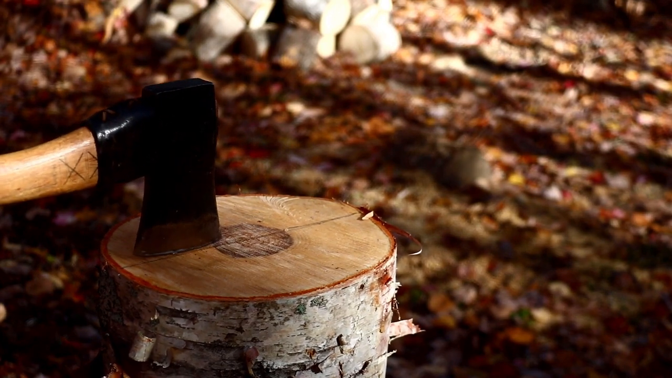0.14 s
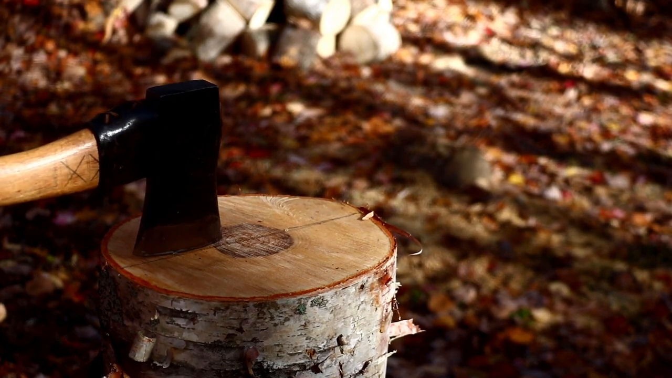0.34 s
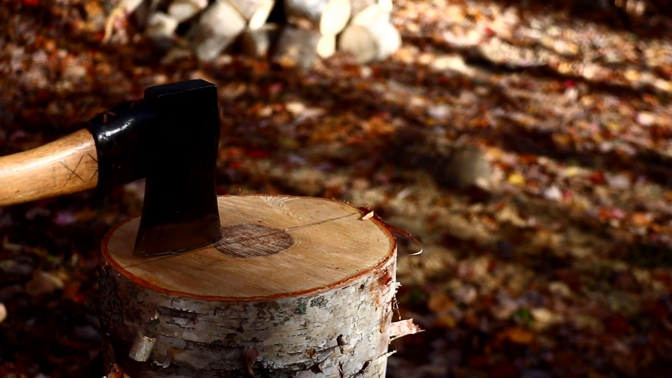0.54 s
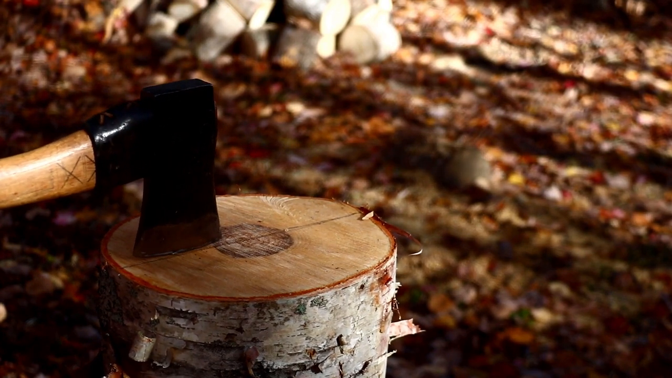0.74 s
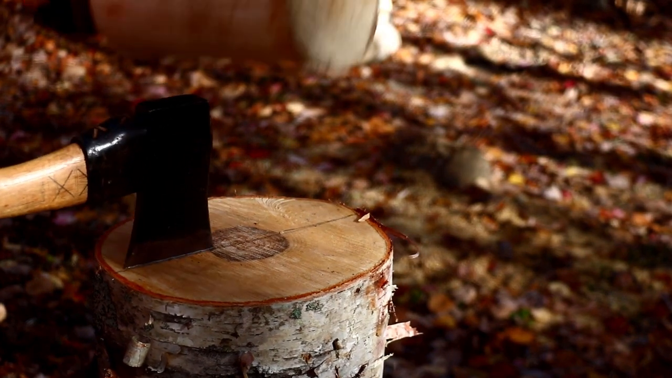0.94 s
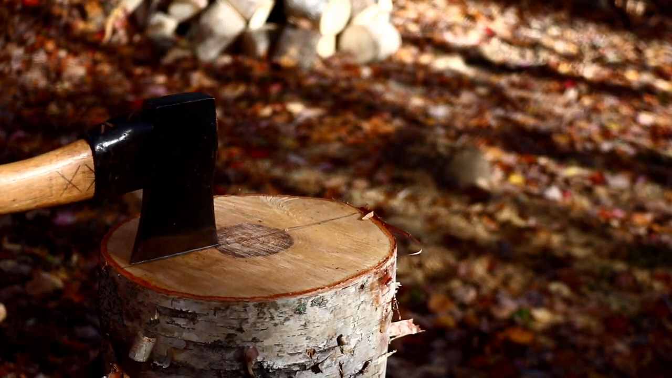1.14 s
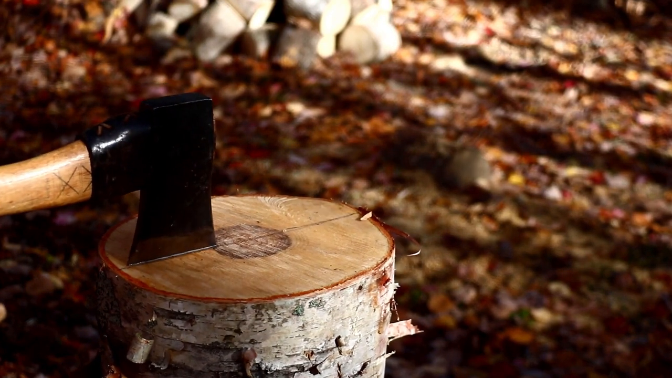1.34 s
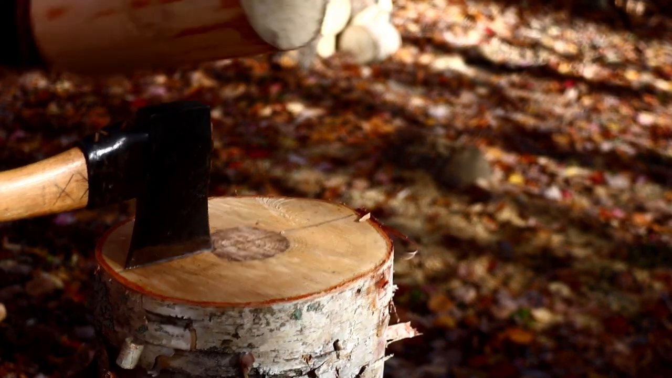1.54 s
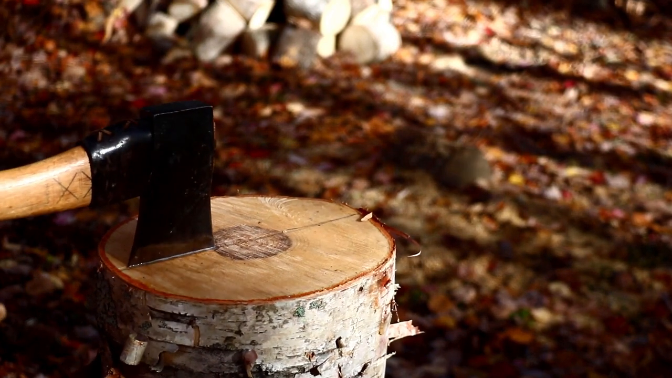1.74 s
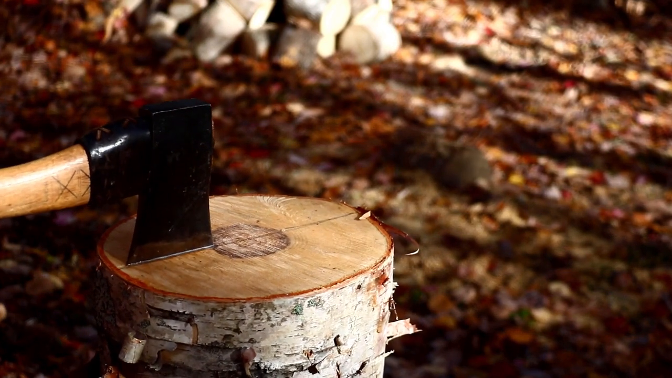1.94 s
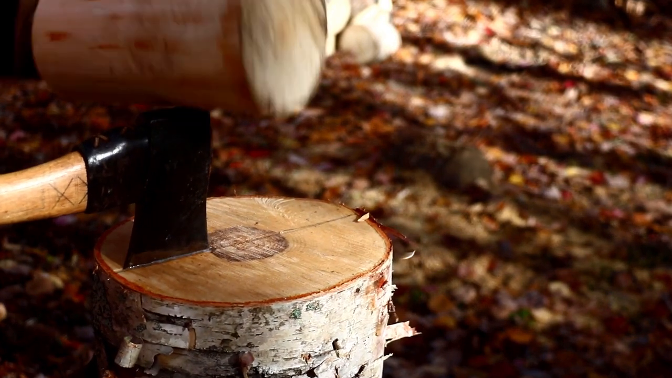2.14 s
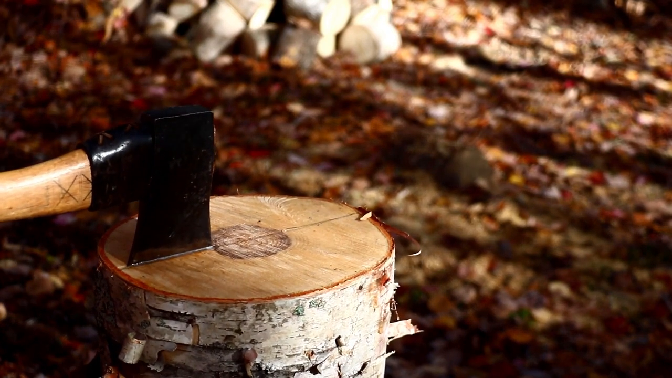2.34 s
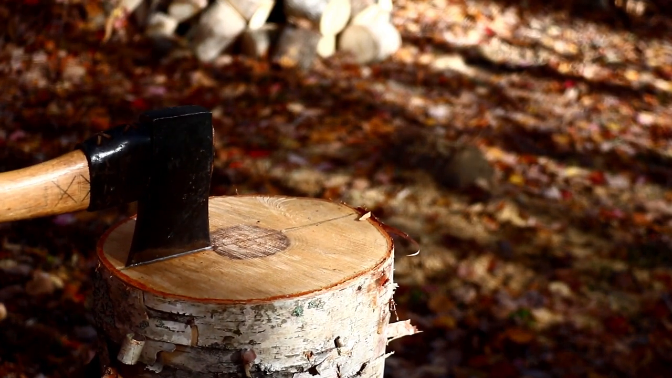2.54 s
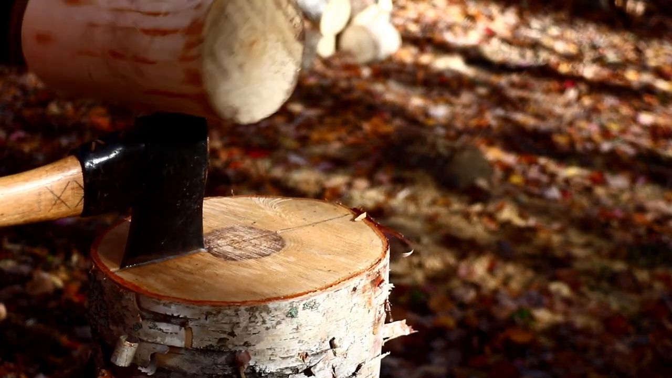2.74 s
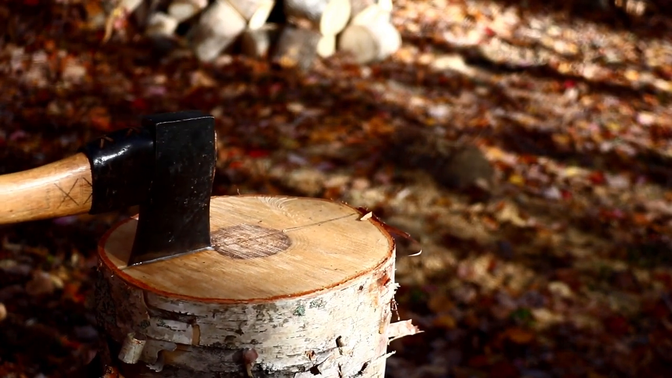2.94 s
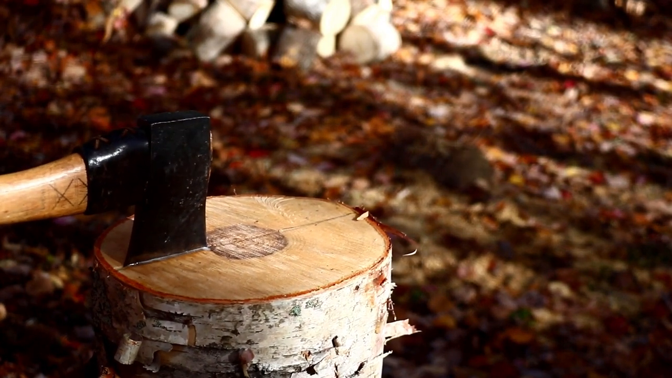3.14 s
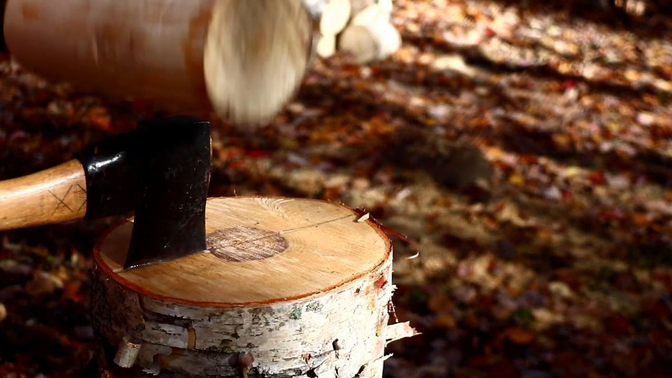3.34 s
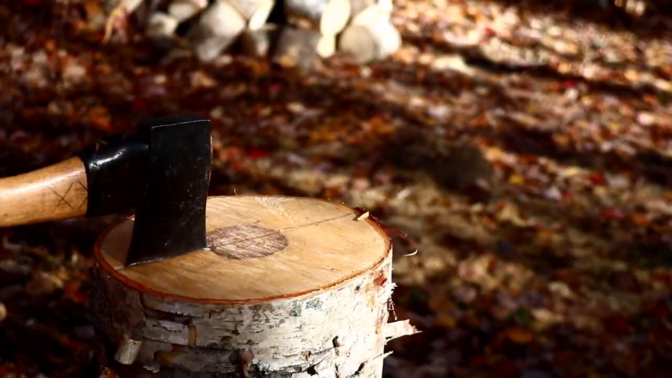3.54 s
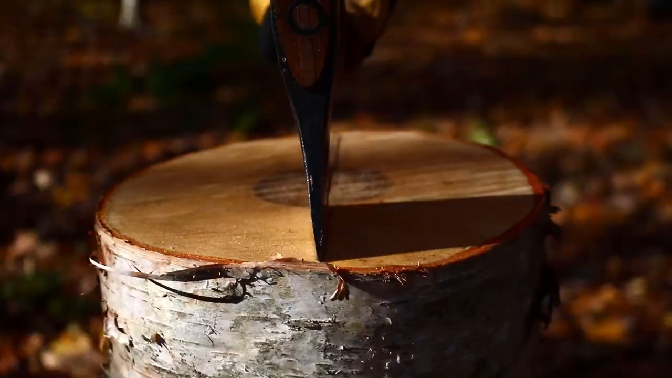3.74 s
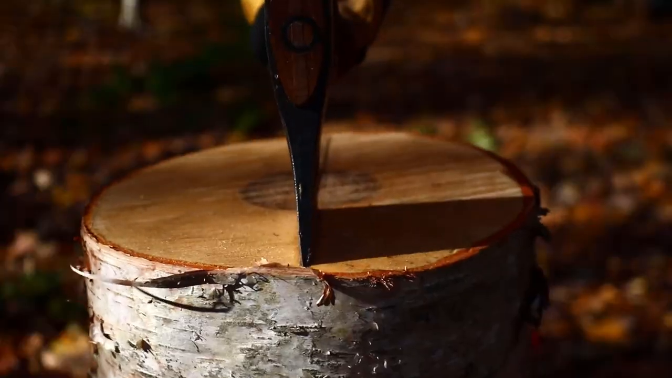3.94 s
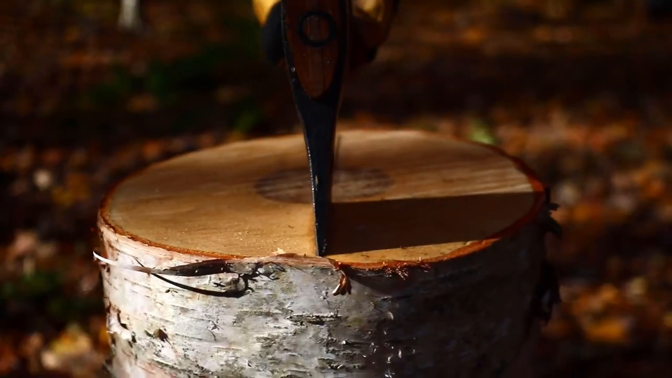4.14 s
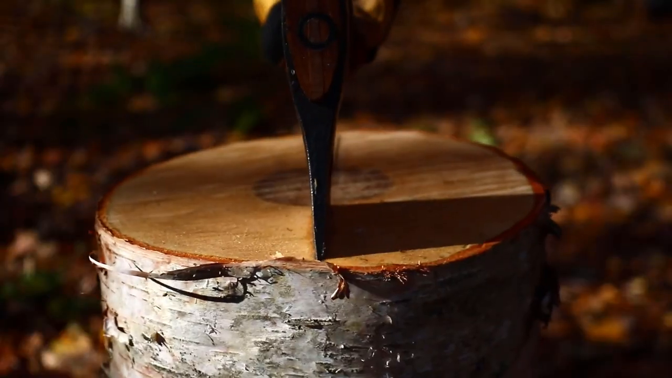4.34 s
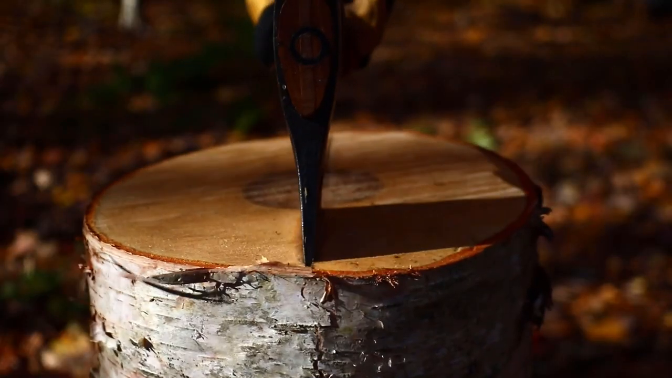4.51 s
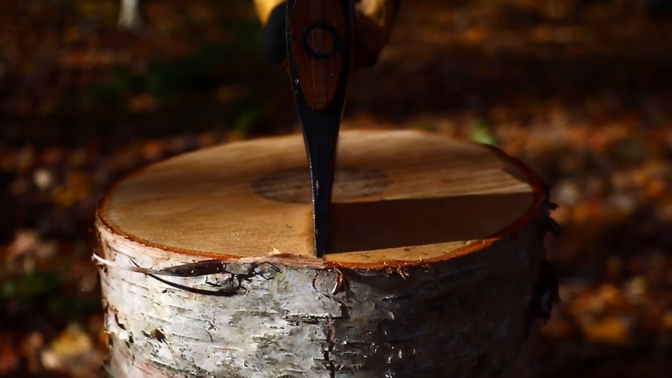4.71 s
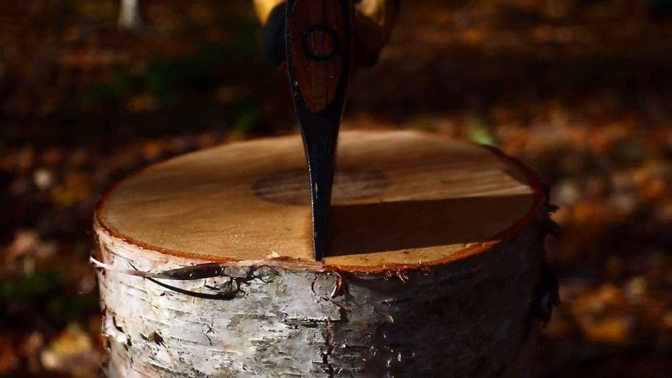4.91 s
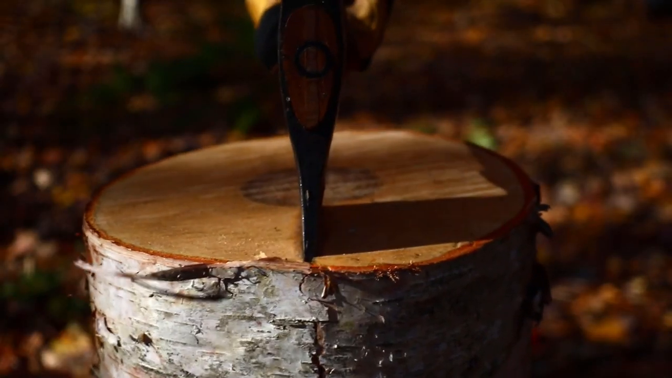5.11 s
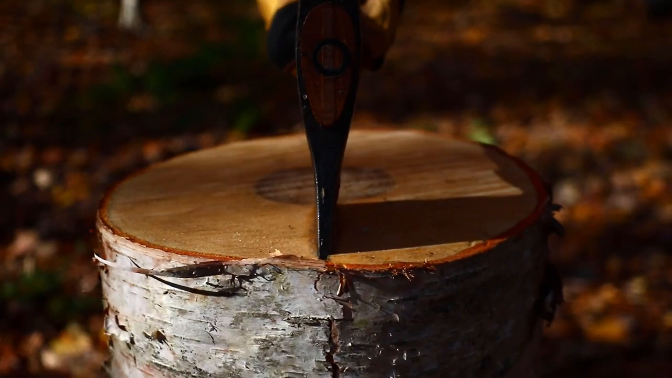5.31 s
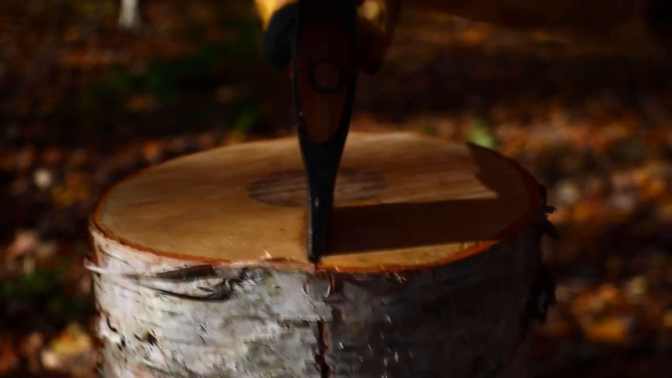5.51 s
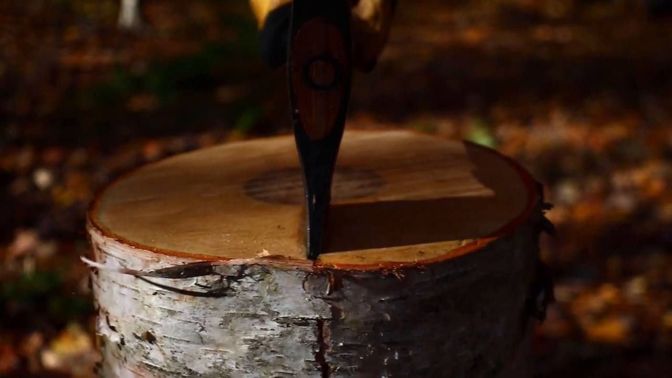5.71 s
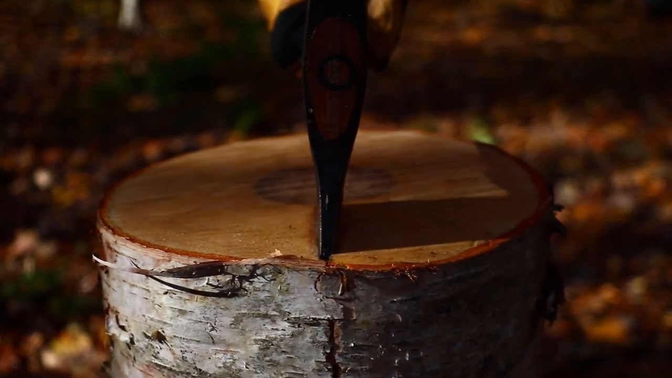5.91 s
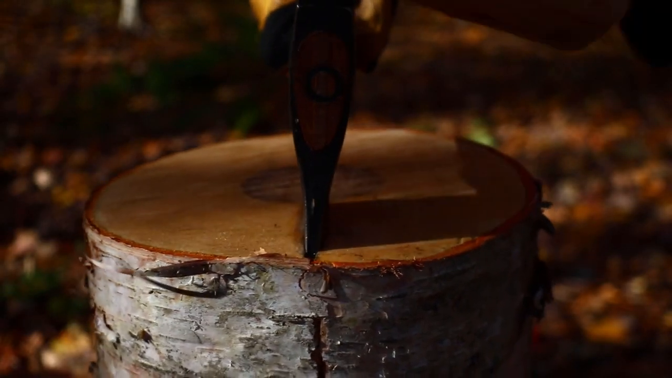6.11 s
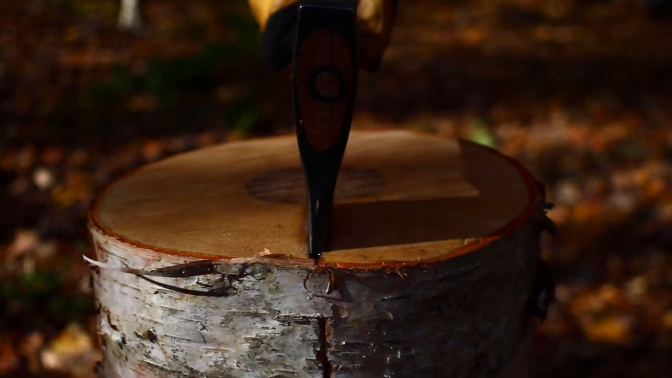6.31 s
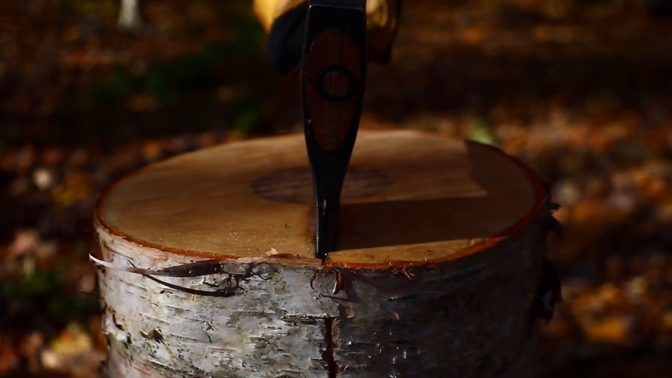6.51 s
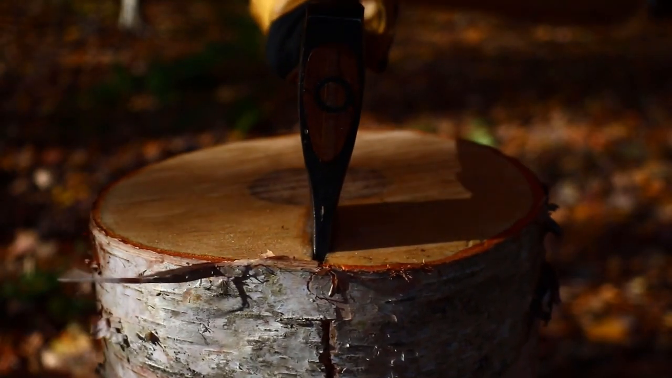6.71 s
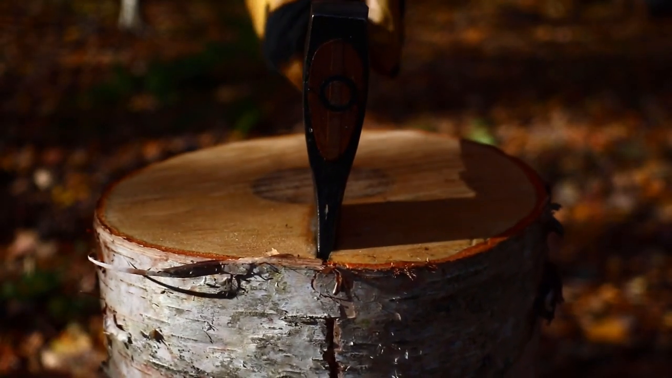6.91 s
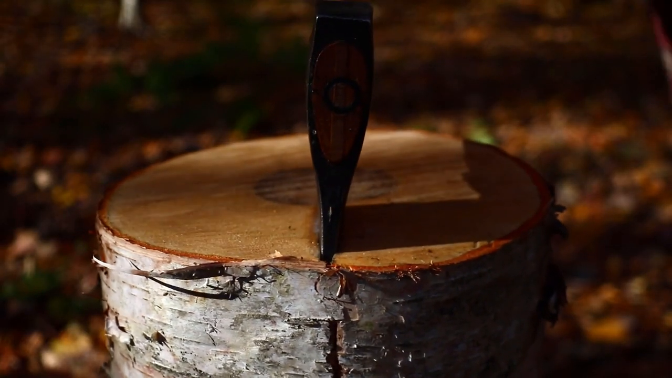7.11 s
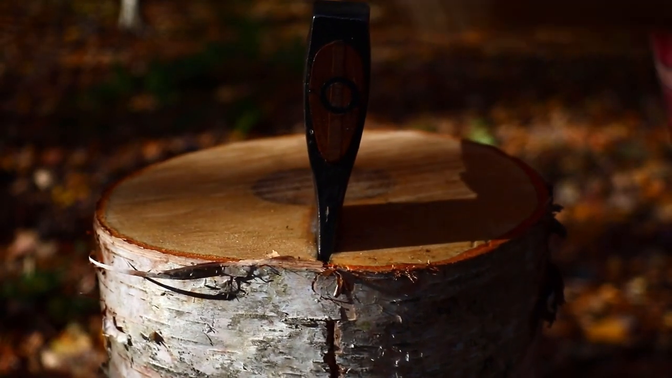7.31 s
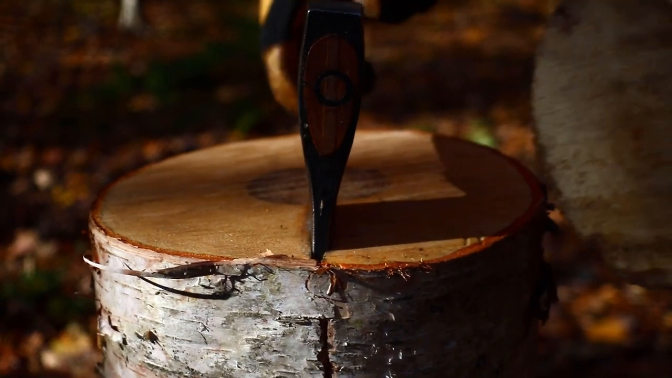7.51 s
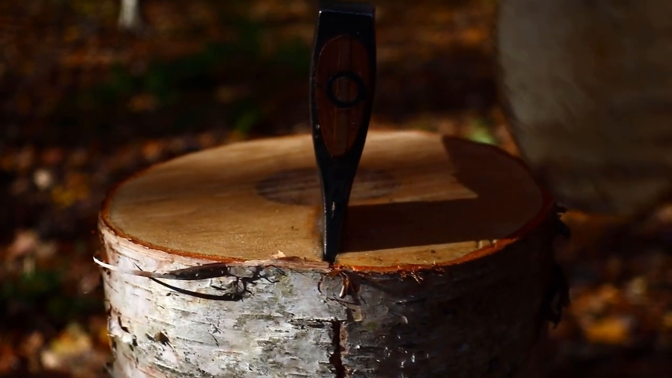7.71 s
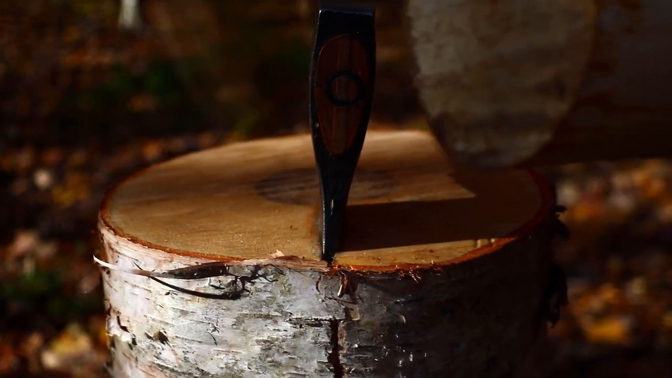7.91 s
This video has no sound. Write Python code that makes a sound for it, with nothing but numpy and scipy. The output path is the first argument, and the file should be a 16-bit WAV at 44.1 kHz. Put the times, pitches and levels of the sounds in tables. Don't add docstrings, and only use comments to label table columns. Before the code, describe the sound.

A quiet outdoor place among trees: leaves rustle, and a low distant engine idles, changes gear at about 0.3 s, then climbs in pitch and fades after 2 s. Faint twig ticks come at 0.4 s. Loud wooden mallet blows on a hatchet fall at 0.9, 1.57, 2.16, 2.75 and 3.3 s, each a short hollow whack with crunch and a little steel ring, clipped by the close microphone, with low tripod shake, a rough fading hum and tree echoes. At 3.7 s the perspective changes and the leaf hiss grows brighter. Six more blows land at 3.9, 4.5, 5.0, 5.6, 6.1 and 6.7 s. From 4.5 s the round rocks and drops with small hollow thumps just after blows; splinters snap around 6.5 s. After a pause, a much softer, dull wooden clunk with dry crackling splinters comes at 7.47 s, leaving rustling leaves.

```python
import sys
import numpy as np
from scipy import signal
from scipy.fft import rfft, irfft
from scipy.io import wavfile
from scipy.ndimage import uniform_filter1d

SR = 44100
rng = np.random.default_rng(int(sys.argv[2]) if len(sys.argv) > 2 else 0)


def decibels_to_gain(level_db):
    exponent = np.asarray(level_db, float) / 20
    return 10 ** exponent


def pcm_store(signal):
    levels = np.round(np.clip(np.atleast_2d(signal), -1, 1) * 32767)
    wavfile.write(sys.argv[1], SR, levels.astype(np.int16).T)


N = 350595

# start_s, level_db, aim, thud_db, crunch_db
BLOW_EVENTS = [(0.898, 10.5, 0.13, 9, -2.5), (1.5659, 10.5, 0.92, -1, -5), (2.162, 14.5, -0.13, -1.5, 9),
               (2.7460, 15, -0.19, -1.5, 2), (3.3110, 12.5, -0.43, 3, -2.5), (3.8822, 14.5, -0.48, -3, -4),
               (4.4569, 13.5, 0.56, 6, 2), (5, 12.5, 0.23, 6, 8.5), (5.564, 13.5, -0.72, -8, -3),
               (6.1390, 12.5, -0.31, 0.5, 0.6), (6.6754, 12.5, -0.012, 5, 4), (7.467, -5.5, -0.56, 0, 7)]
# start_s, level_db, contact_ms, crack_db
LANDINGS = [
    (4.5, -12.5, 1.6, 0),
    (5.049, -7.5, 0.86, 1),
    (5.609, -10.5, 3, -8),
    (6.168, -21, 0.8, -8),
    (6.2116, -10.5, 1.67, -12),
    (6.2177, -16.5, 1.14, -22),
    (6.7087, -7.5, 0.61, -1),
    (6.716, -10.5, 1.15, -22),
    (6.743, -13, 0.59, -14),
]
# start_s, level_db, centre_hz, width_octaves
SPLINTER_TICKS = [(.3828, -36.5, 1500, 1.2), (0.383, -38.5, 4500, 1.05), (.868, -51, 4530, 2.2),
                  (3.211, -41, 1950, 0.91), (4.524, -30.5, 2200, 2), (5.067, -31, 1900, 1.1),
                  (6.440, -36, 1400, 2.1), (6.460, -40, 3500, 2), (6.472, -41, 4500, 1.1),
                  (6.5, -30, 1700, 1.1), (6.4998, -35, 4500, 1.1), (6.508, -37, 3000, 2.3),
                  (6.711, -24, 2450, .4), (7.342, -44.5, 9500, 1.5), (7.4674, -19, 1500, 1.2),
                  (7.4716, -17, 4600, 1.8), (7.479, -29, 1500, 1.5), (7.486, -24, 2400, 1.1),
                  (7.495, -36, 3300, .6), (7.501, -36, 2300, 1.8)]
# pitch_hz, t60_s, level_db, aim_slope_db
WOOD_MODES = [(340.4, 0.029, 2.05, -3), (445.3, 0.042, -0.5, -1.9), (613, 0.18, -0.5, 1.6),
              (679.2, 0.13, -2.5, -10.5), (989, 0.053, 0.4, 5.5), (1283.4, 0.054, -7.5, 7)]
# pitch_hz, level_db, t60_s
WOOD_OVERTONES = [(847, -9.5, 0.085), (1053, -6, 0.059), (1154, -13, 0.063), (1421, -4, 0.033),
                  (1508.7, -7, 0.05), (1726, -19.5, 0.052), (2035, -10.5, 0.035)]
# pitch_hz, level_db, t60_s
STEEL_MODES = [(2466, -7.5, 0.028), (2559, -8, 0.019), (3500, -8.5, 0.0094)]
# pitch_hz, level_db, t60_s
LANDING_MODES = [(287, -11.5, 0.081), (471, 5.5, 0.041), (700, -5, 0.051), (970, -34, .04)]
# pitch_hz, level_db, t60_s
TRIPOD_MODES = [
    [(32.2, -13, 0.87), (52.5, 4.5, 0.43), (76.5, 1.5, 0.45)],
    [(32.3, -4.5, 0.95), (43.9, 6, 0.55), (64.3, -6, 0.69)],
]
# centre_hz, width_octaves, level_db, t60_s
TREE_BANDS = [
    [(229, 1, -20.5, 0.45), (424, 0.66, -7.5, 0.27), (660, 1, -4, 0.18), (670, 1, -16.5, 0.93),
     (980, 0.33, -16.5, 0.95), (1170, 0.75, -18, 0.91), (1800, 0.46, -30.5, 1), (2500, 0.23, -21.5, 0.62),
     (3250, 0.7, -31, 0.64), (6400, 0.83, -35.5, 0.46), (11000, 0.79, -45, 0.39)],
    [(231, 0.62, -15, 0.24), (416, 0.6, -18, 0.46), (697, 0.091, -36, 0.15), (695, 0.93, -21.5, 1),
     (1105, 0.52, -18.5, 0.84), (1460, 0.6, -22, 0.77), (1970, 0.78, -29, .6), (2490, 0.091, -27, 0.98),
     (3250, 0.83, -34.5, 0.77), (6840, 0.73, -37.5, 0.46), (10500, .7, -48, 0.48)],
]
# delay_s, level_db
ECHO_CLUSTERS = [
    (.060, -28.5),
    (.063, -38),
]
# pitch_hz, level_db (per Hz)
AIR_COLOURS = [
    [(20, -20), (90, -0.5), (200, -8), (360, -2), (900, -10), (6500, -15.5), (9000, -21.5), (15800, -26.5)],
    [(20, -24), (84, -8), (260, -1.5), (730, -3.5), (1700, -6), (6100, -7), (9000, -13.5), (15800, -26.5)],
]
# start_s, end_s
SERIES_SPANS = [
    (.9, 3.31),
    (3.88, 6.68),
    (7.46, 7.95),
]
# overtone_hz, body_hz
SPLIT_NOTES = [
    (852.5, 972),
    (787.4, 1030),
    (780, 1040),
]

CONTACT_MS, RING_SHARE = (4.5, 5.5, 10.2), (0.8, 0.71, .4)
STEEL_DB, CRACK_DB, TRIPOD_DB = (0, 8, -19), (-3.5, -6, 5.5), (4.5, 3.5, 8.5)
ECHO_DB, HUM_DB = (-1.5, 1.3, -13), (5, -3.5, -8)
ECHO_TILT_DB = 0.8, 0.32, 6
UPPER_FACE_DB = 0.7, -9, 7.5
OPENS_DB = -2, 8, .1
CRACK_AIM_DB, ECHO_AIM_DB, TILT_AIM_DB, HUM_AIM_DB, STEEL_AIM_DB = 8.5, 3.5, 1.53, 4, 5.5
HUM_HZ, HUM_SAG_HZ, TILT_DEPTH_DB = 1055, -110, 0.64
BURIED_DB, BURIED_POWER = -33, 7.5
IDLE_HZ, IDLE_DB, GEAR_S, GEAR_DIP_S = 50, -61, .32, .07
PULL_HZ, PULL_HZ_PER_S, PULL_DB, GONE_S, FADE_DB_PER_S = 53, 10.5, -54, 2.05, -40
RUMBLE_DB, RUMBLE_DB_PER_S, RUMBLE_AFTER_DB = -80.5, 6.5, -70
BREEZE_DB, CEILINGS = (-47.5, -40.5), (1.0, .78)
SCENE_CHANGE_S = 3.718
FRAME_S, FRAME_START, FRAME_LATE, SMEAR_S = 1024 / 48000, .88, .91, .0045
GAPS_HZ, GAPS_SHARE, GAP_FRAMES, GAP_BINS, TOP_HZ = 7000, .38, 3, 6, 15700


def blows():
    out = np.zeros(N)
    shove = np.pad(np.hanning(600) / 300, (0, SR))
    for s, db, *swing in BLOW_EVENTS:
        knock, echo_db, tilt_db, tripod_db, hum_db, hum_hz = aimed(s, *swing)
        knock = decibels_to_gain(db) * knock
        setup = int(s > SCENE_CHANGE_S)
        add(out, knock, s)

        smear = band(burst(0.00099, count=190)[::-1], 1850, 3.1)
        add(out, decibels_to_gain(db - 3.0) * smear, s - 190 / SR)

        delay_s, cluster_db = ECHO_CLUSTERS[setup]
        cluster = np.convolve(band(knock[:3000], 1200, 1.33), burst(0.0091, count=1500))
        add(out, decibels_to_gain(cluster_db + echo_db) * cluster, s + delay_s)
        add(out, decibels_to_gain(db + echo_db - 5.5) * trees(TREE_BANDS[setup], tilt_db), s)
        add(out, decibels_to_gain(db + hum_db - 28.0) * hum(hum_hz), s)
        add(out, decibels_to_gain(db + tripod_db - 39.5) * tripod(shove, TRIPOD_MODES[setup]), s + 0.013)
    return out


def aimed(s, aim, thud_db, crunch_db):
    k = sum(s > end + .1 for _, end in SERIES_SPANS)
    start, end = SERIES_SPANS[k]
    depth = np.clip((s - start) / (end - start), 0, 1)
    strike = np.array([db + aim * slope_db for *_, db, slope_db in WOOD_MODES])
    strike[:3] += thud_db, OPENS_DB[k] * depth, UPPER_FACE_DB[k]
    crack_db = CRACK_DB[k] + aim * CRACK_AIM_DB
    steel_db = STEEL_DB[k] + aim * STEEL_AIM_DB
    knock = blow(SPLIT_NOTES[k], strike, RING_SHARE[k], CONTACT_MS[k], crunch_db, crack_db, steel_db)
    echo_db = ECHO_DB[k] + aim * ECHO_AIM_DB
    tilt_db = ECHO_TILT_DB[k] + aim * TILT_AIM_DB + depth * TILT_DEPTH_DB
    hum_db = HUM_DB[k] + aim * HUM_AIM_DB + BURIED_DB * depth ** BURIED_POWER
    return knock, echo_db, tilt_db, TRIPOD_DB[k], hum_db, HUM_HZ + depth * HUM_SAG_HZ


def blow(notes_hz, strike, ring, crunch_ms, crunch_db, crack_db, steel_db):
    t = np.arange(SR // 2) / SR
    struck = [(hz, db, ring * t60) for (hz, t60, *_), db in zip(WOOD_MODES, strike)]

    free = 1 - np.exp(-t / 0.0088)
    free *= 0.4 + 0.83 * np.exp(-(t / 0.013) ** 2)
    mallet = decibels_to_gain(-2.0) * free * scattered(struck[2:4], 0.001978)

    body = struck[4:] + [(hz, db, ring * t60) for hz, db, t60 in WOOD_OVERTONES]
    overtone_hz, body_hz = notes_hz
    body[2] = (overtone_hz, *body[2][1:])
    body[0] = (body_hz, *body[0][1:])
    wood = scattered(struck[:2], 0.00304, 0.11) + scattered(body, .003, 0.028)
    steel = decibels_to_gain(steel_db) * scattered(STEEL_MODES, .0015)

    fibres = burst(crunch_ms / 1000, count=SR // 2)
    crunch = decibels_to_gain(crunch_db + 23.5) * band(fibres, 1180, 1.61)
    crack = band(fibres, 6500, 1.38) + decibels_to_gain(-4.5) * band(fibres, 14600, 1.0)
    return band(mallet + wood + steel, 1760, 5.25) + crunch + decibels_to_gain(crack_db + 21) * crack


def hum(hz):
    t = np.arange(SR) / SR
    swell = 1 - np.exp(-t / 0.024)
    return decibels_to_gain(-60 * t / 1.65) * swell * band(rng.standard_normal(SR), hz, 0.097)


def tripod(shove, table):
    return modes(shove, [(hz * (1 + .04 * rng.standard_normal()), *rest) for hz, *rest in table])


def trees(table, tilt_db):
    t = np.arange(SR) / SR
    clumps = decibels_to_gain(20 * uniform_filter1d(rng.standard_normal(SR), size=400))
    tail = 0
    for hz, octaves, db, t60 in table:
        decay = decibels_to_gain(db + tilt_db * np.log2(hz / 1000) - 60 * t / t60)
        tail = tail + decay * band(rng.standard_normal(SR), hz, octaves)
    return tail * clumps * (1 - np.exp(-(t / 0.0019) ** 2))


def landings():
    out = np.zeros(N)
    for s, db, contact_ms, crack_db in LANDINGS:
        push = np.pad(np.hanning(max(int(contact_ms * SR / 1000), 3)), (0, SR // 4))
        crack = band(burst(0.0034, count=len(push)), 1300, 2.3)
        body = modes(push / push.sum(), LANDING_MODES)
        add(out, decibels_to_gain(db) * (body + decibels_to_gain(crack_db + 18.5) * crack), s)
    return out


def ticks():
    out = np.zeros(N)
    for s, db, hz, octaves in SPLINTER_TICKS:
        add(out, decibels_to_gain(db + 31) * band(burst(.001, count=1000), hz, octaves), s)
    return out


def drone():
    t = np.arange(N) / SR
    pulling = t > GEAR_S
    hz = np.where(pulling, PULL_HZ + PULL_HZ_PER_S * (t - GEAR_S), IDLE_HZ)
    db = np.where(pulling, PULL_DB, IDLE_DB) + FADE_DB_PER_S * np.maximum(t - GONE_S, 0)
    gear_dip = 1 - np.exp(-((t - GEAR_S) / GEAR_DIP_S) ** 2)
    tone = decibels_to_gain(db) * gear_dip * np.sqrt(2) * np.sin(2 * np.pi * np.cumsum(hz) / SR)
    rumble = band(rng.standard_normal(N), 77, 0.43)
    rumble_db = np.where(t > SCENE_CHANGE_S, RUMBLE_AFTER_DB, RUMBLE_DB + RUMBLE_DB_PER_S * t)
    return tone + decibels_to_gain(rumble_db) * rumble / rumble.std()


def air(spectrum):
    hz, db = np.transpose(spectrum)
    grid = np.maximum(np.fft.rfftfreq(N, 1 / SR), 1)
    colour = decibels_to_gain(np.interp(np.log(grid), np.log(hz), db))
    x = irfft(rfft(rng.standard_normal(N)) * colour, N)
    x *= decibels_to_gain(25 * uniform_filter1d(rng.standard_normal(N), size=4000))
    return x / np.std(x)


def modes(push, table):
    out = 0
    for hz, db, t60 in table:
        pole = np.exp(2j * np.pi * hz / SR - np.log(1000) / (t60 * SR))
        out = out + decibels_to_gain(db) * signal.lfilter([1], [1, -pole], push).imag
    return out


def scattered(table, spread_s, detune=0.013):
    out = np.zeros(SR // 2)
    for (hz, db, t60), (late, off) in zip(table, rng.random((len(table), 2))):
        push = np.zeros(SR // 2)
        push[int(late * spread_s * SR)] = 1
        out += modes(push, [(hz * (1 + detune * (off - .5)), db, t60)])
    return out


def band(x, hz, octaves):
    edges = hz * 2 ** (-octaves / 2), min(hz * 2 ** (octaves / 2), .45 * SR)
    return signal.sosfilt(signal.butter(2, edges, "bandpass", fs=SR, output="sos"), x)


def burst(seconds, count):
    x = rng.standard_normal(count) * np.exp(-np.arange(count) / (seconds * SR))
    return x / np.sqrt(np.sum(x ** 2))


def add(track, x, s):
    i = int(s * SR)
    track[i:i + len(x)] += x[:N - i]


def scene():
    front = np.arange(N) / SR > SCENE_CHANGE_S
    splitting = blows() + landings() + ticks()
    side_air, front_air = (decibels_to_gain(db) * air(colour) for db, colour in zip(BREEZE_DB, AIR_COLOURS))
    return (splitting + np.where(front, front_air, side_air) + drone())[None]


def treble_gaps(x):
    hop = int(FRAME_S * SR)
    hz, _, z = signal.stft(x, SR, nperseg=2 * hop)
    luck = rng.standard_normal((len(hz) // GAP_BINS + 1, z.shape[-1]))
    luck = uniform_filter1d(luck, size=GAP_FRAMES) * np.sqrt(GAP_FRAMES)
    luck = np.repeat(luck, GAP_BINS, axis=0)[:len(hz)]
    odds = GAPS_SHARE * np.clip((hz - GAPS_HZ) / (TOP_HZ - GAPS_HZ), 0, 1)
    unlucky = 1 / (1 + np.exp(-1.7 * luck)) < odds[:, None]
    quiet = np.abs(z[:, hz > GAPS_HZ]).max(axis=-2, keepdims=True) < decibels_to_gain(-52)
    return signal.istft(z * ~(unlucky & quiet), SR, nperseg=2 * hop)[1][..., :N]


def hush_before_blows(x):
    t = np.arange(N) / SR
    low = signal.sosfiltfilt(signal.butter(4, GAPS_HZ, fs=SR, output="sos"), x)
    heard = np.ones((2, N))
    for s, *_ in BLOW_EVENTS:
        late = (s / FRAME_S - FRAME_START) % 1
        hushed = (t > s - late * FRAME_S) & (t < s - SMEAR_S)
        heard[int(late > FRAME_LATE):, hushed] = decibels_to_gain(-34)
    heard = uniform_filter1d(heard, size=40)
    return low * heard[0] + (x - low) * heard[1]


def top_cut(x):
    return signal.sosfilt(signal.butter(12, 16180, fs=SR, output="sos"), x)


def record(dry):
    front = np.arange(N) / SR > SCENE_CHANGE_S
    ceiling = np.where(front, CEILINGS[1], CEILINGS[0])
    x = treble_gaps(np.clip(dry, -ceiling, ceiling))
    x = hush_before_blows(x)
    x = signal.sosfilt(signal.ellip(12, .2, 70, TOP_HZ, fs=SR, output="sos"), x)
    return top_cut(np.clip(x, -1, 1))


dry = scene()
out = record(dry)
pcm_store(out)
```